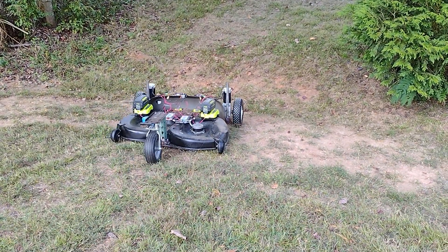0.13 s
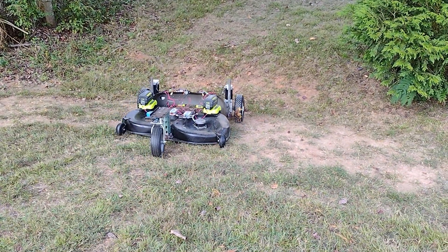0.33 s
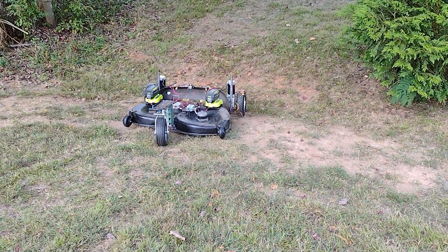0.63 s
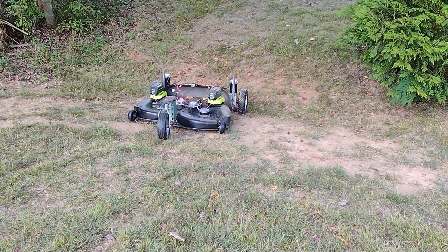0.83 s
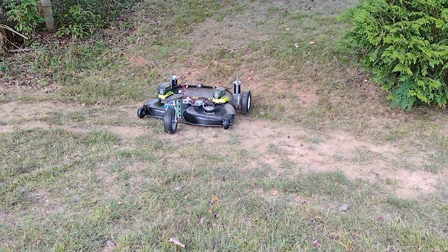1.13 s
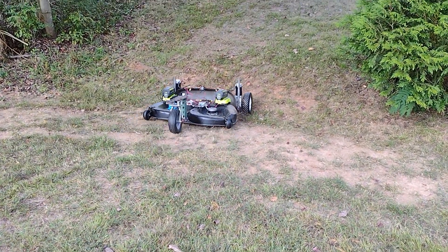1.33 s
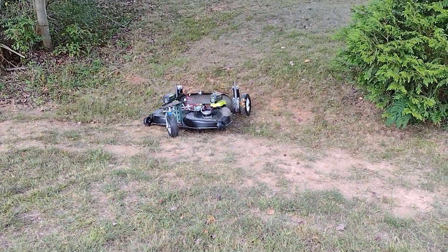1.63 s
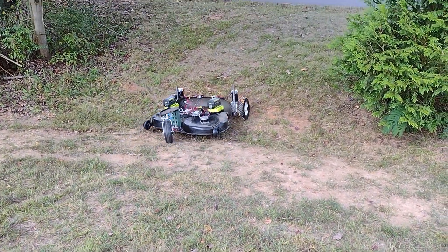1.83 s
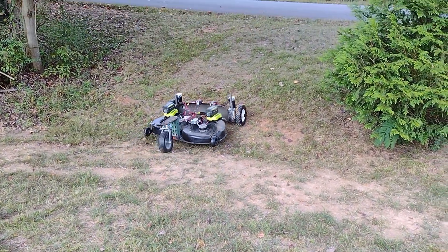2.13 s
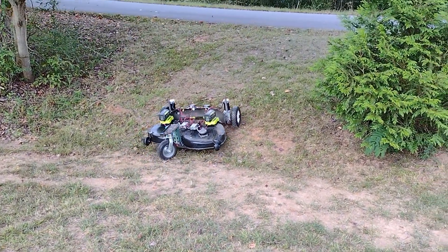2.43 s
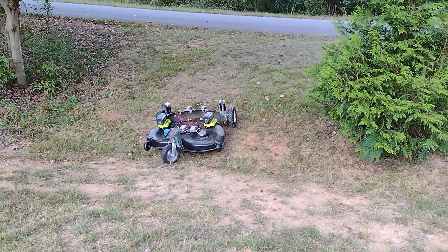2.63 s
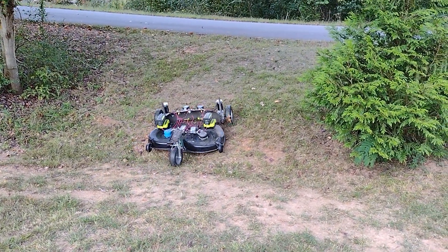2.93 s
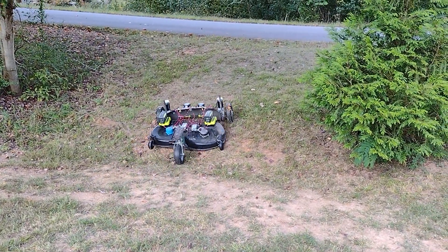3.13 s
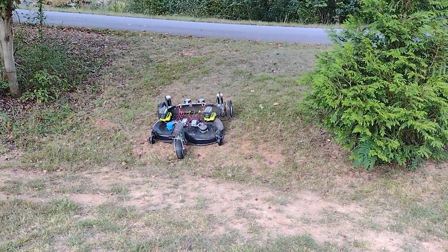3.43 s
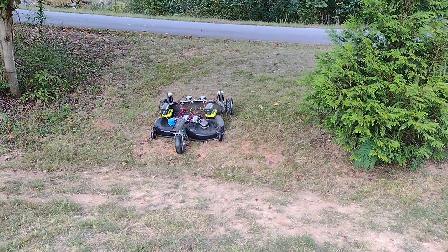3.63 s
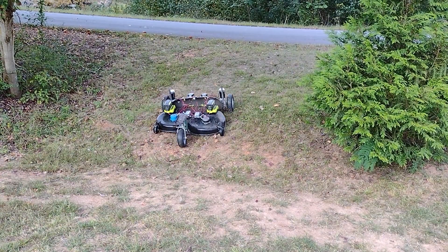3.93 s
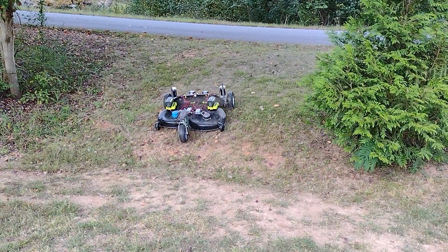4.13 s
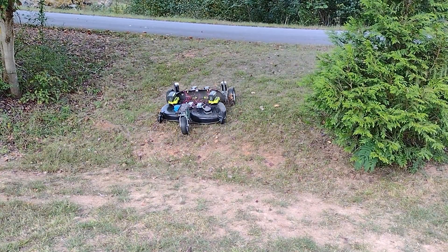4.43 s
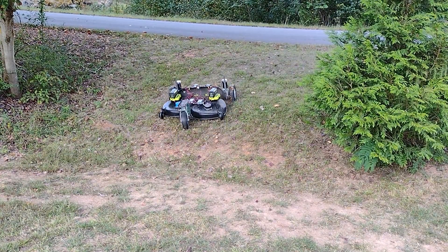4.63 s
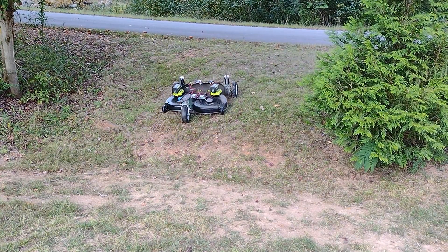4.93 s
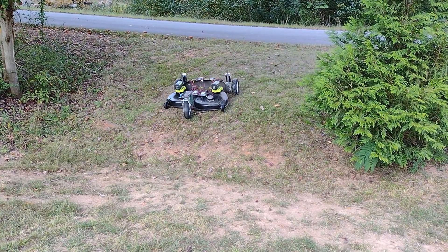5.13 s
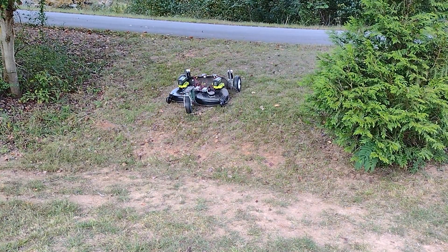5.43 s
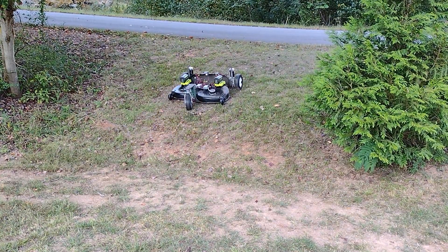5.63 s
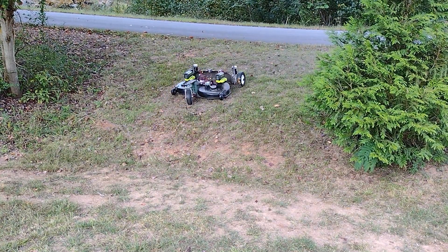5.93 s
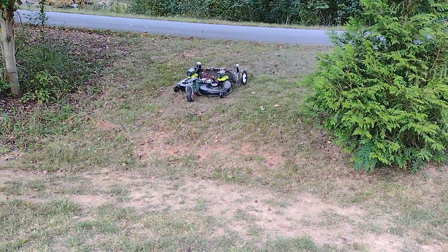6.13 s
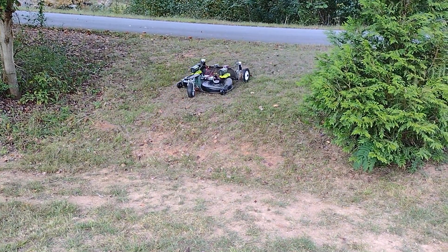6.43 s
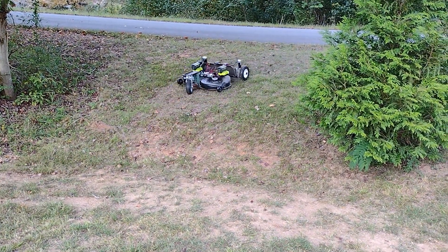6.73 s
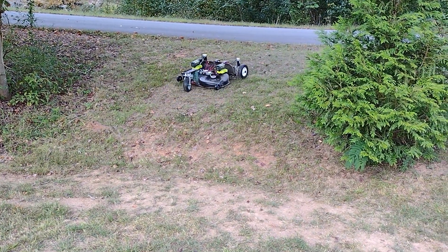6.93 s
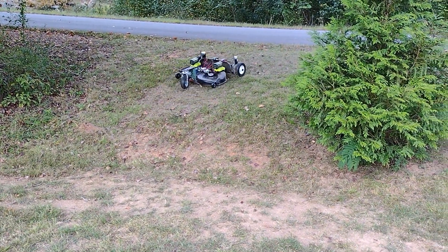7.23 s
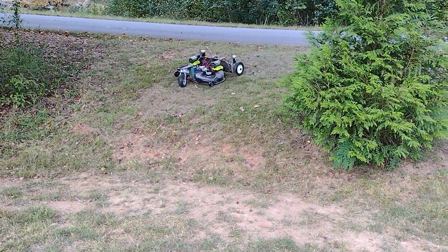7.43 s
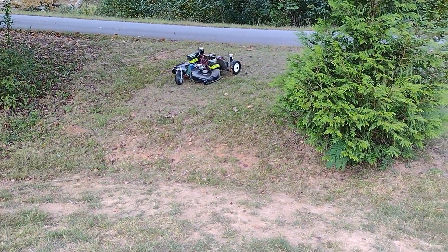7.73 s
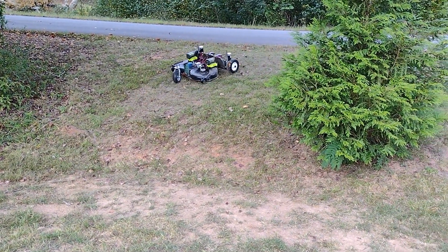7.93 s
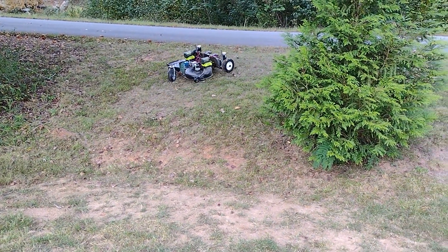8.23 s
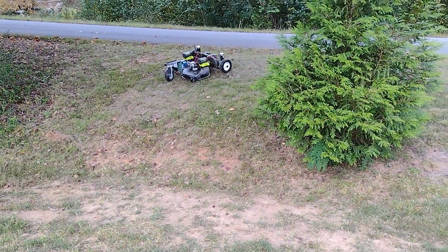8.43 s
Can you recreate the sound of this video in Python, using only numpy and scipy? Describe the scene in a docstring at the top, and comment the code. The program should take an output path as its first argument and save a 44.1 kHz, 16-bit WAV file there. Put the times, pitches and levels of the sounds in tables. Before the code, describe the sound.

Outdoors, a wavering high motor tone, a hard burst of metallic rattling early on, then crackling grass footsteps and snaps over distant insect buzz.

```python
"""On a grassy slope, a small radio-controlled mower climbs while insects sing far off in the open air.
Its motors whine at the controller's switching pitch: a wavering tone with three overtones.
Its deck rattles and knocks over the bumps: clicks and noise bursts make its parts ring.
Dry grass crunches under the walker who holds the microphones: clumped crackle, with short dry
snaps and clicks made of noise bursts."""
import sys
import numpy as np
from scipy import signal
from scipy.fft import rfft, irfft, next_fast_len
from scipy.io import wavfile

SR = 44100
rng = np.random.default_rng(int(sys.argv[2]) if len(sys.argv) > 2 else 0)


def transcribe(u):
    """Save the signal u as a 16-bit wav file named by the first command-line argument.

    u: samples, shape (n,) or (channels, n), limited to [-1, 1]; the rate is SR.
    q: integer samples, one column per channel.
    """
    v = np.clip(np.atleast_2d(u).T, -1, 1)
    q = np.round(v * 32767).astype(np.int16)
    wavfile.write(sys.argv[1], SR, q)


N = 378025
T = np.arange(N) / SR  # time of each sample, s
SIZE = next_fast_len(N, True)
HZ = np.fft.rfftfreq(SIZE, 1 / SR)


def gain_of(db):
    """Turn decibels into an amplitude factor."""
    return 10 ** (np.asarray(db) / 20)


def evened(x):
    """Scale a sound to an average power of 1."""
    return x / np.sqrt(np.mean(x ** 2) + 1e-20)


def spectrum(x):
    """Split a sound into its frequencies."""
    return rfft(x, SIZE)


def sound(z):
    """Put the frequencies back together as a sound."""
    return irfft(z, SIZE)[..., :N]


def read(points, hz):
    """Read a table over pitch, with straight lines on a logarithmic pitch scale."""
    f, value = np.transpose(points)
    return np.interp(np.log(hz + 1), np.log(f + 1), value)


def curves(rows):
    """Draw straight lines over time through every column of a table."""
    s, *columns = np.transpose(rows)
    return [np.interp(T, s, column) for column in columns]


def wander(per_s):
    """Random drift: straight lines between chance values of typical size 1, per_s of them a second."""
    knots = np.arange(0, T[-1] + 1, 1 / per_s)
    return np.interp(T, knots, rng.standard_normal(2000)[:len(knots)])


def clicks(per_s, spread_db):
    """Clicks at random moments and of uneven size, with an average power of 1."""
    unevenness_db = spread_db * np.minimum(rng.exponential(1, N), 4)
    size = gain_of(unevenness_db) * rng.standard_normal(N)
    happens = rng.random(N) < per_s / SR
    return evened(size * happens)


def bursts(rows, weight_db, seconds, rise_s=0.000057):
    """Loudness curve that rises fast and dies away (time constants in s) from each row's time."""
    out = np.zeros(N)
    t = np.arange(0, 7 * seconds, 1 / SR)
    shape = np.exp(-t / seconds) * (1 - np.exp(-t / rise_s))
    for row, db in zip(rows, weight_db):
        piece = out[round(row[0] * SR):][:len(t)]  # a view: adding to it fills out
        piece += (gain_of(db) * shape)[:len(piece)]
    return out


def ring(x, hz, width):
    """One resonance (pitch and width in Hz); steady noise comes out about as strong at any width."""
    r = np.exp(-np.pi * width / SR)
    b = np.sqrt(1 - r ** 2)
    return signal.lfilter([b, 0, -b], [1, -2 * r * np.cos(2 * np.pi * hz / SR), r ** 2], x)


def shaped(x, points):
    """Colour a sound with a table of (frequency [Hz], level [dB]), then even its power."""
    return evened(sound(spectrum(x) * gain_of(read(points, HZ))))


# How much louder the left microphone is: (frequency [Hz], left minus right [dB])
MIC_LEAN = [(60, -1.5), (110, 0), (200, 0), (380, 0.5), (700, -2.5), (1290, 8), (2380, -5), (4400, -13),
            (8120, -1.5), (15000, -1.5)]
# How far the left microphone is ahead: (frequency [Hz], phase lead [radians])
MIC_LEAD = [(60, 0.015), (500, 0.14), (1380, 1), (2300, 0.4), (3360, 1)]


def pair(a, b, same):
    """Two microphones: left hears a; right hears part of a, later in phase, and part of the unlike b."""
    a, b = spectrum(a), spectrum(b)
    likeness = np.clip(read(same, HZ), -1, 1)
    half_lean = gain_of(read(MIC_LEAN, HZ) / 2)
    right = likeness * a + np.sqrt(1 - likeness ** 2) * b
    right = right * np.exp(-1j * read(MIC_LEAD, HZ))
    return sound(np.array([a * half_lean, right / half_lean]))


# How alike far sounds are in both microphones: (frequency [Hz], likeness [0 to 1])
FAR_LIKENESS = [(60, 1), (180, 0.46), (550, 0.28), (1650, 0.18), (4970, 0.24), (15000, 0.0096)]
# Colour of the open air: (frequency [Hz], relative level per Hz [dB])
AIR_COLOUR = [(30, -26.5), (55, -1.5), (76, 4.5), (130, -4), (400, -13), (700, -8.5), (1130, -14.5),
              (3700, -19.5), (6000, -35), (9000, -35), (12500, -27.5), (15000, -46.5), (17000, -26)]
AIR_LEVEL_DB = -70.5  # before drift and microphone lean


def air():
    """Distant hum and hiss of the open air: coloured noise whose level drifts a little."""
    sides = []
    for _ in range(2):
        drift_db = 0.86 * wander(per_s=3.1)
        noise = shaped(rng.standard_normal(N), AIR_COLOUR)
        sides.append(noise * gain_of(AIR_LEVEL_DB + drift_db))
    return pair(*sides, FAR_LIKENESS)


# Wing resonances of the insects: (frequency [Hz], width of each pass [Hz], relative level [dB])
WING_RESONANCES = [(7225, 490, -1), (7500, 480, 1), (7980, 150, -11)]
INSECTS_LEVEL_DB = -64  # before microphone lean


def insects():
    """A far chorus: fast random clicks pass twice through narrow wing resonances."""
    sides = []
    for _ in range(2):
        flutter_db = 0.5 * wander(per_s=120) + 0.7 * wander(per_s=2.354)
        buzz = clicks(5000, 1.4) * gain_of(flutter_db)
        chorus = sum(gain_of(db) * ring(ring(buzz, hz, width), hz, width)
                     for hz, width, db in WING_RESONANCES)
        sides.append(evened(chorus))
    return gain_of(INSECTS_LEVEL_DB) * pair(*sides, FAR_LIKENESS)


# Feet in dry grass: (start time [s], length [s], crunch level [dB], top octave against crunch [dB])
FOOTSTEPS = [(1.012, 0.055, -62.5, -11), (1.24, .1, -70.5, -10), (1.511, 0.31, -62.5, -16.5),
             (1.974, 0.065, -79, -2), (2.297, 0.11, -69.5, -24), (2.922, 0.23, -66.5, -9),
             (3.334, 0.092, -62.5, -11), (3.44, 0.066, -54.5, -5), (3.61, 0.063, -61.5, -28),
             (3.71, 0.067, -63, -12), (4.103, 0.13, -76, -5), (4.268, 0.22, -67, -2), (4.49, 0.19, -69, -3),
             (4.677, 0.2, -59, -4.5), (4.905, 0.063, -76, -5), (5.04, 0.12, -67.5, -3),
             (5.26, 0.25, -62.5, -1), (5.754, 0.16, -71.5, -5), (6.207, .15, -80, -3),
             (6.93, .22, -68, -6.5), (7.3, 0.068, -75, -8), (7.991, 0.18, -79, -5)]
PRESS_S, LIFT_S = 0.031, 0.033  # straight rise; time constant of the fall


def treads(levels_db):
    """Loudness curve of the footsteps: the sole comes down, rolls over and lifts."""
    out = np.zeros(N)
    for (start, length, *_), db in zip(FOOTSTEPS, levels_db):
        press = np.clip((T - start) / PRESS_S, 0, 1)
        lift = np.exp(-np.maximum(T - start - length, 0) / LIFT_S)
        out += gain_of(db) * press * lift
    return out


# Grass stirring between steps: (time [s], level [dB])
GRASS_RUSTLE = [(0, -76), (2.5, -70), (3.2, -65.5), (5.3, -69), (6.0, -73), (6.7, -78.5), (8.57, -79)]
RUSTLE_BRIGHT_DB = -7.5  # top octave of the rustle, against the rest
# Short dry snaps and clicks:
# (time [s], strength [dB], top octave strength [dB], low click strength [dB])
DRY_SNAPS = [(0.728, -51, -72, -60), (2.101, -41, -64, -61), (2.783, -45, -75, -52),
             (4.138, -43, -46, -47.5), (4.302, -40, -43, -63), (4.5018, -58, -47, -50),
             (4.7293, -39, -64, -68), (4.9505, -44, -68, -68), (5.1193, -54, -67, -56),
             (5.215, -41, -55, -72), (5.3456, -48, -44, -58), (5.416, -42, -46, -71),
             (5.4318, -43, -43, -72), (5.8471, -52.5, -57.5, -69), (6.921, -47, -85, -89),
             (6.947, -54, -70, -84), (6.968, -52, -62.5, -84), (7.0174, -45.5, -68, -70),
             (7.1368, -53, -74.5, -61), (8.072, -56, -57, -84), (8.2804, -68, -85, -55)]
# Pitches of the small crackles: (frequency [Hz])
CRACKLE_PITCHES = [2910, 3330, 4780, 5530]
# Colour of dry grass: (frequency [Hz], relative level per Hz [dB])
GRASS_COLOUR = [(700, -16), (1800, -16.5), (3200, -4), (4800, -4), (7000, -7), (9500, -3), (12000, -2.5),
                (14800, 4.5), (17000, -6.5)]


def grass():
    """Clumped crackle under the soles, and noise bursts for short dry snaps and clicks."""
    _, _, step_db, bright_db = np.transpose(FOOTSTEPS)
    _, dull_db, sharp_db, deep_db = np.transpose(DRY_SNAPS)
    rustle = gain_of(curves(GRASS_RUSTLE)[0])
    crunch = rustle + treads(step_db)
    sizzle = rustle * gain_of(RUSTLE_BRIGHT_DB) + treads(step_db + bright_db)
    clumps = [gain_of(3.4 * wander(per_s=40)) for _ in range(5)]
    bunches = gain_of(2.5 * wander(per_s=60))  # stalks give way in bunches
    top = np.clip((HZ - 7000) / 1700.0, 0, 1)  # share of the bright octave
    colour = gain_of(read(GRASS_COLOUR, HZ))
    colour /= np.sqrt(np.mean(colour ** 2))
    sides = []
    for _ in range(2):
        noise = rng.standard_normal((2, N))
        pitched = sum(ring(clicks(230, 2.2) * clump, hz, 680.0)
                      for hz, clump in zip(CRACKLE_PITCHES, clumps))
        dull = (0.25 * pitched + 1.54 * noise[0]) * crunch * bunches
        dull += noise[1] * bursts(DRY_SNAPS, dull_db, 0.0072)
        fizz = clicks(1500, 2.5) * clumps[4] + 0.88 * noise[0]
        bright = fizz * sizzle + noise[1] * bursts(DRY_SNAPS, sharp_db, 0.0026)
        crackle = sound(colour * (spectrum(dull) * (1 - top) + spectrum(bright) * top))
        low_click = ring(noise[1] * bursts(DRY_SNAPS, deep_db, 0.0038), 840.0, 870.0)
        sides.append(crackle + low_click)
    likeness = [(500, 0.32), (3300, 0.41), (5500, -0.44), (15000, 0.2)]  # (Hz, -1 to 1)
    return gain_of([[1.5], [-1.5]]) * pair(*sides, likeness)


AFTER_DB, AFTER_S, AFTER_RISE_S = -14.5, 0.058, 0.0048  # rattle after a blow: level, fall, rise


def part(modes, roll_db, rows, blow_db, spread_db, chatter_s, uneven_db, rise_s=0.00043, after_db=AFTER_DB):
    """One deck part: rattle and blows make its modes ring, each blow leaving it rattling for a moment."""
    rattle = gain_of(roll_db) + bursts(rows, blow_db + after_db, AFTER_S, AFTER_RISE_S)
    blows = rng.standard_normal(N) * bursts(rows, blow_db, chatter_s, rise_s)
    force = clicks(1500, spread_db) * rattle + blows
    out = np.zeros((2, N))
    for hz, db, t60 in modes:
        favour = gain_of(uneven_db * wander(per_s=22))  # each contact point favours other modes
        rung = gain_of(db) * ring(force * favour, hz, 1.97 / t60)
        out += [rung, rung * wander(per_s=16)]  # seen from two sides
    return out / np.linalg.norm(gain_of([mode[1] for mode in modes]))


# Rings of the four deck parts: (frequency [Hz], relative level [dB], nominal ring time [s])
SHELL_RINGS = [(135, -14, 0.2), (197.7, -3, 0.12), (237.7, -1, 0.054), (284.5, -5, 0.064),
               (330.8, -8, 0.22), (375, -2, 0.059), (454, -16, 0.066), (527.6, -4.5, 0.041),
               (588, -19, 0.052), (790, -10.5, 0.0033), (890, -24.5, 0.054)]
BLADE_RINGS = [(683.3, -2.5, 0.19), (701, 0, 0.1)]
FITTING_RINGS = [(1071, 6.5, 0.046), (1165, 0.5, .04), (1326, -2., 0.045), (1478, 4.5, 0.012),
                 (1670, -0.5, 0.035), (1770, -6.5, 0.0071), (1905, 5.5, 0.017), (2152, 2.5, 0.091),
                 (2366, -1.5, 0.062), (2556, -29.5, 0.037)]
PIN_RINGS = [(3128, 10, 0.025), (3330, -2, 0.022), (3330, -11, 0.025)]
# Ground roughness, heard as rolling rattle of the shell, rising and falling: (time [s], level [dB])
GROUND_ROUGHNESS = [(0.0, -68.5), (0.5, -69.5), (1.15, -73), (1.46, -65.5), (1.6, -45), (2.5, -65),
                    (3.1, -72.5), (3.5, -65.5), (4.2, -63.5), (5.0, -72.5), (5.35, -73), (6.0, -83),
                    (6.5, -110)]
BLADES_ROLL_DB, FITTINGS_ROLL_DB = -5.5, -5.  # rattle of the lighter parts, against the shell
# Single blows on the deck: (time [s], shell strength [dB], blades strength [dB], fittings strength [dB])
DECK_KNOCKS = [(0.025, -43, -42, -65), (0.287, -55, -38.5, -54), (0.305, -52, -44, -56.5),
               (0.325, -50.5, -66, -82), (0.401, -44, -60, -72), (0.497, -48.5, -56, -53.5),
               (0.724, -72, -61, -58), (1.297, -47.5, -37, -49.5), (1.321, -47, -53, -64),
               (1.49, -31.5, -30, -27.5), (1.575, -30, -24.5, -30), (1.631, -29, -26, -38),
               (1.666, -32.5, -24, -29.5), (1.711, -36.5, -36, -33.5), (1.756, -32.5, -30, -35.5),
               (1.795, -51, -26, -61), (1.865, -56, -42, -42), (1.941, -37.5, -38, -49),
               (2.032, -41, -33.5, -36.5), (2.113, -65, -36.5, -53), (2.203, -56, -62, -62),
               (2.251, -52, -39, -54.5), (2.308, -68, -75, -73), (2.429, -72, -56, -62),
               (2.778, -53.5, -57.5, -54), (2.881, -65, -72, -56.5), (3.055, -71, -75, -64),
               (3.207, -50.5, -76, -68), (3.351, -50.5, -64, -81), (3.408, -45.5, -60, -55),
               (3.485, -50, -66, -62), (3.537, -51.5, -68, -59), (3.631, -47.5, -53, -49),
               (3.89, -44.5, -43, -59), (3.948, -48, -59, -63), (4.062, -52, -58, -73),
               (4.097, -45, -48, -56), (4.145, -52, -70, -77), (4.208, -49, -62, -81),
               (4.6, -50.5, -61, -56), (4.764, -46.5, -45.5, -53.5), (4.807, -48, -56, -61),
               (5.262, -54, -53, -63), (5.289, -59, -54, -62)]
# Loose pins jumping in their holes: (time [s], strength [dB])
PIN_CLINKS = [(0.21, -64), (0.306, -61), (0.59, -59), (0.724, -51.5), (0.91, -62), (1.321, -57),
              (1.489, -35.5), (1.575, -52), (1.63, -41), (1.667, -27), (1.756, -64), (1.866, -46),
              (2.31, -65), (2.776, -46), (2.88, -49.5), (3.207, -54.5), (3.351, -54), (4.765, -53)]
# How alike the deck sounds in both microphones: (frequency [Hz], likeness [0 to 1])
NEAR_LIKENESS = [(60, 0.29), (130, 0.91), (290, 0.98), (640, 0.7), (1410, 0.81), (3100, 0.2), (6820, 0.047),
                 (15000, 0.018)]


def deck():
    """Heavy shell, ringing blades, loose fittings and pins; soft contacts give little treble."""
    shell_db = curves(GROUND_ROUGHNESS)[0] + 3.8 * wander(per_s=25)  # lumpy ground
    blades_db = shell_db + BLADES_ROLL_DB
    fittings_db = shell_db + FITTINGS_ROLL_DB
    pins_db = 1.34 * fittings_db - 2.0  # only hard jolts shake the pins loose
    _, thud_db, clang_db, clack_db = np.transpose(DECK_KNOCKS)
    clink_db = np.transpose(PIN_CLINKS)[1]
    low = part(SHELL_RINGS, shell_db, DECK_KNOCKS, thud_db,
               spread_db=2.5, chatter_s=0.02, uneven_db=2.0, rise_s=0.0032)
    low += part(BLADE_RINGS, blades_db, DECK_KNOCKS, clang_db,
                spread_db=-1.0, chatter_s=0.012, uneven_db=6.0, rise_s=0.003, after_db=-18.0)
    high = part(FITTING_RINGS, fittings_db, DECK_KNOCKS, clack_db,
                spread_db=-2.0, chatter_s=0.023, uneven_db=2.0)
    high += part(PIN_RINGS, pins_db, PIN_CLINKS, clink_db,
                 spread_db=7.5, chatter_s=0.011, uneven_db=1.5)
    low = signal.sosfilt(signal.butter(3, 1100., fs=SR, output="sos"), low)
    high = signal.sosfilt(signal.butter(3, [800., 4300.], "band", fs=SR, output="sos"), high)
    return pair(*(low + high), NEAR_LIKENESS)


SWITCH_HZ = 998.5  # the controller's switching pitch, before its slight waver
# The whine swells with the load: (time [s], level [dB])
WHINE_LEVEL = [(0.0, -50.5), (0.084, -46), (0.36, -70), (0.548, -52), (1.19, -65), (1.31, -53.5),
               (1.44, -59), (2.04, -46), (2.42, -73), (2.76, -58.5), (2.97, -81), (3.22, -54.5),
               (3.62, -58.5), (3.94, -43), (4.24, -60), (4.38, -49.5), (4.6, -45.5), (4.68, -60),
               (5.23, -54), (5.4, -63.5), (5.77, -55), (5.919, -67), (6.501, -63), (6.76, -59.5),
               (7.52, -59.5), (8.4, -53.5), (8.57, -54.5)]
# Overtones come and go as the pulse width changes:
# (time [s], second partial level [dB], third partial level [dB], fourth partial level [dB])
OVERTONE_LEVELS = [(0.0, -91, -71.5, -101), (1.4, -89.5, -76.5, -82), (2.4, -83.5, -69.5, -85),
                   (3.6, -78, -78.5, -78.5), (4.7, -73.5, -71, -87), (5.6, -89, -91, -89),
                   (5.95, -89, -79, -84), (6.401, -88.5, -91.5, -83), (6.9, -100, -102, -81),
                   (7.46, -99, -91, -75.5), (8.0, -92.5, -83, -91), (8.3, -89, -81, -100),
                   (8.57, -90, -82, -108)]
# The whine between the microphones, shifting with the ground echo:
# (time [s], left minus right [dB], left phase lead over right [radians])
WHINE_BALANCE = [(0, 4.5, 0.56), (2.3, 1, 1.27), (5, 6.5, 0.74), (5.7, 10, 0.53), (6.1, 1.5, -1.4),
                 (6.5, 8.5, 0.39), (8.1, 3.5, -0.63), (8.57, 0.5, 0.36)]


def motors():
    """Motor whine: the switching tone and three overtones, wavering a little in pitch and level."""
    phase = 2 * np.pi * np.cumsum(SWITCH_HZ + 0.5 * wander(per_s=12)) / SR
    lean_db, lead = curves(WHINE_BALANCE)
    sides = [(lean_db, lead), (1., .3), (-4., -.8), (-5., -1.)]  # dB and radians for each partial
    levels_db = curves(WHINE_LEVEL) + curves(OVERTONE_LEVELS)  # joins the two lists
    out = np.zeros((2, N))
    for k, (db, (side_db, angle)) in enumerate(zip(levels_db, sides)):
        waver_db = 2.0 * wander(per_s=20)
        overtone_waver_db = 5.0 * min(k, 1) * wander(per_s=11)  # none on the first tone
        level = np.sqrt(2) * gain_of(db + waver_db + overtone_waver_db)
        for ear, sign in enumerate((.5, -.5)):  # left, right
            tone = np.cos((k + 1) * phase + sign * angle)
            out[ear] += level * gain_of(sign * side_db) * tone
    return out


def scene():
    """Everything together, from the background to the mower."""
    return air() + insects() + grass() + deck() + motors()


EDGE_HZ = 15900  # upper band limit


def record(dry):
    """The microphones drop the lowest bass; then a steep filter cuts the highest treble."""
    thin = signal.sosfilt(signal.butter(2, 70., "high", fs=SR, output="sos"), dry)
    low_pass = signal.firwin(511, EDGE_HZ, window=("kaiser", 9), fs=SR)
    return signal.oaconvolve(thin, low_pass[None], "same")


dry = scene()
out = record(dry)
transcribe(out)
```